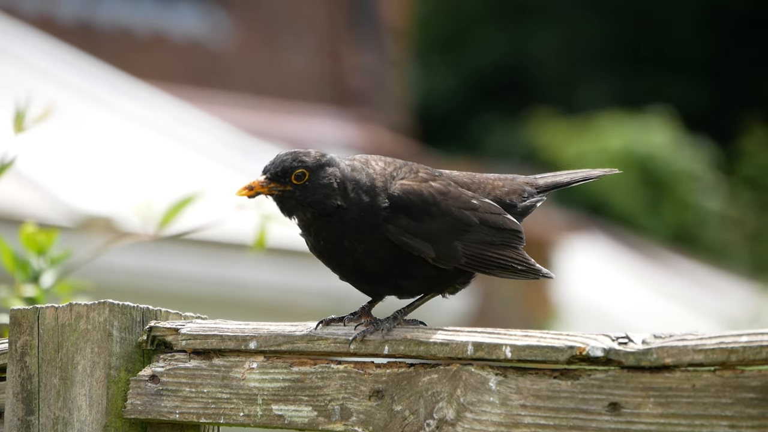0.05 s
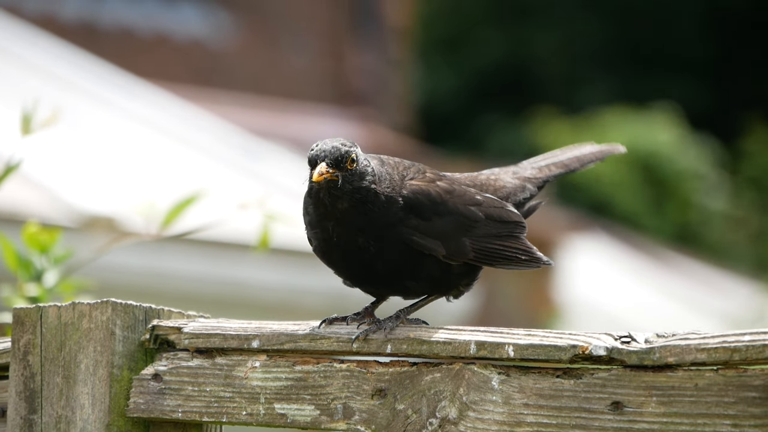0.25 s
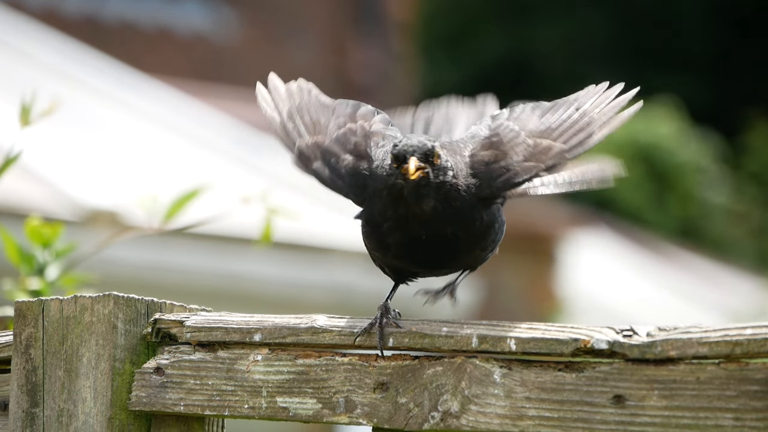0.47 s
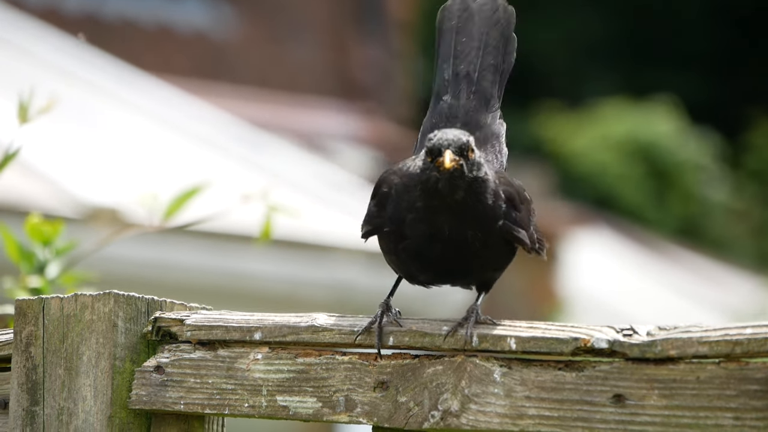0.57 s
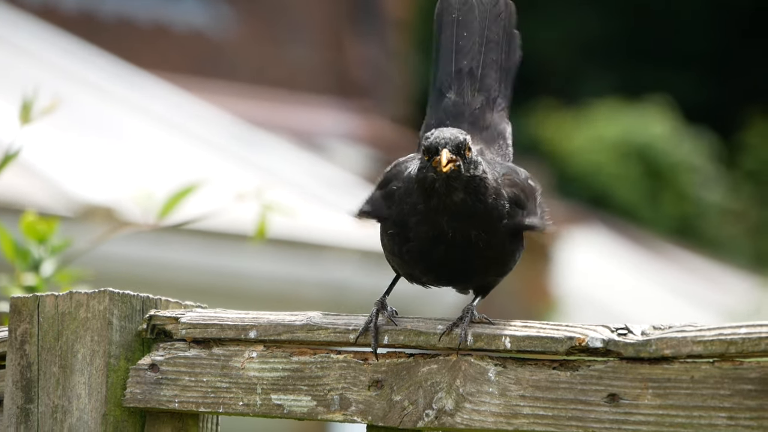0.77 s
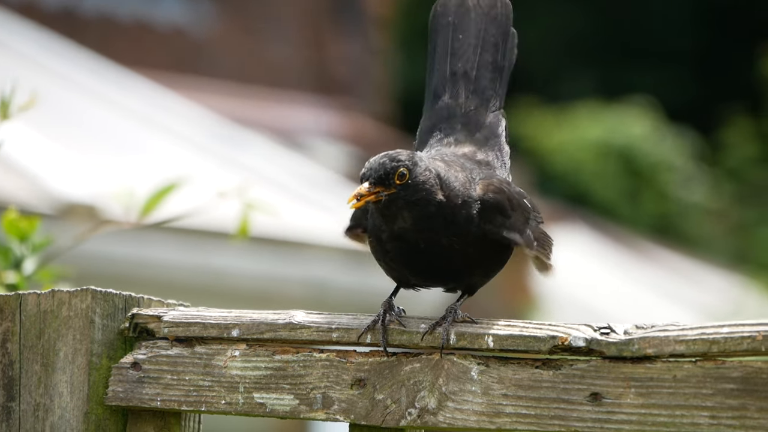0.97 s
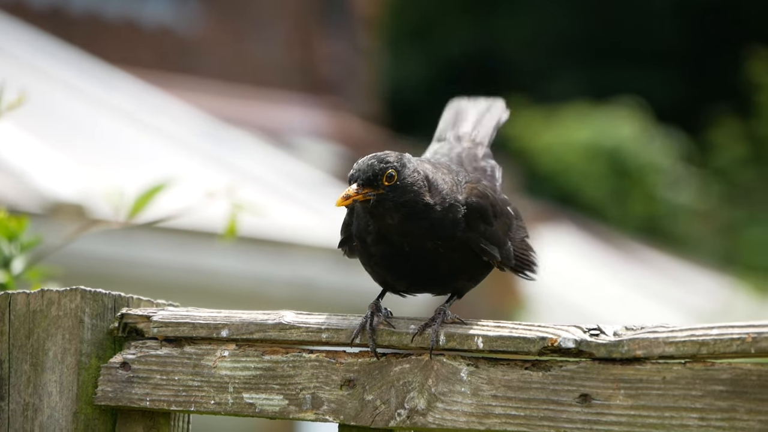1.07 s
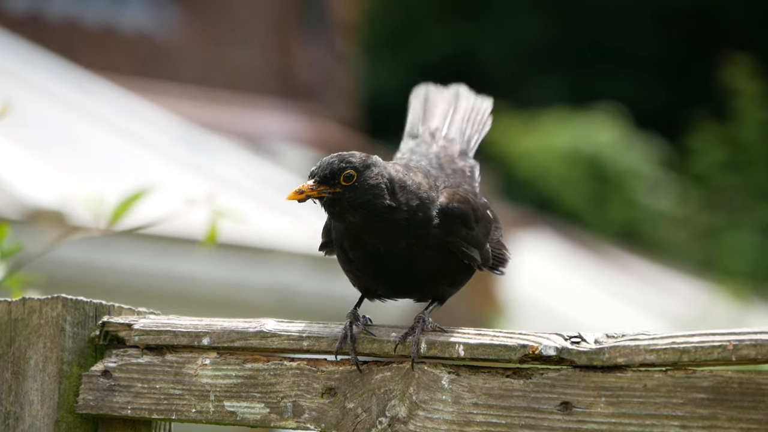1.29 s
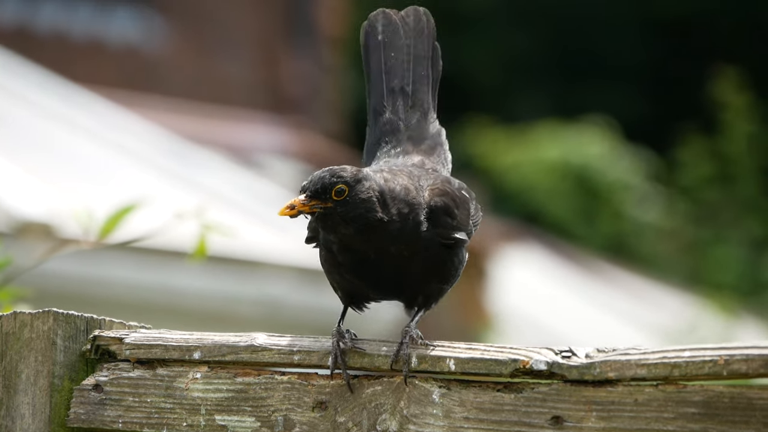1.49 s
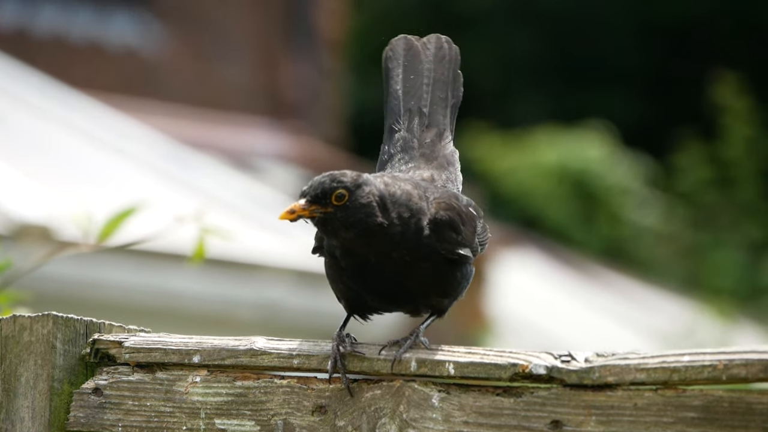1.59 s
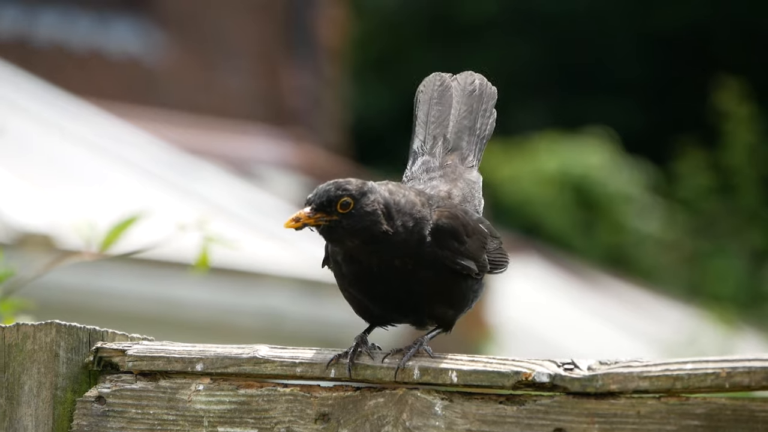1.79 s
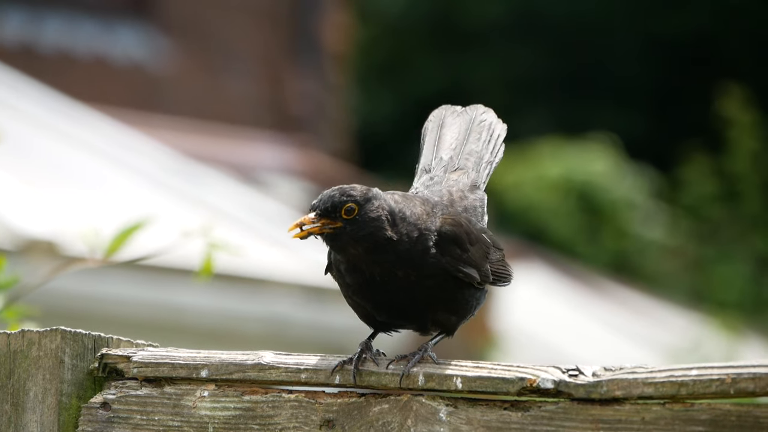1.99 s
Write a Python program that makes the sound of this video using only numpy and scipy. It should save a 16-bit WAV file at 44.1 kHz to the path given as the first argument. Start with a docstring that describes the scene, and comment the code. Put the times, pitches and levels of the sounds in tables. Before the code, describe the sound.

A blackbird gives a quick run of sharp clucks, then two shrill chinks.

```python
"""In a garden, a blackbird on a fence scolds: one soft low note, six clucks of rising pitch, then
two shrill chinks. Both sides of its voice organ (the syrinx) sound at once and mix, making extra
tones at the sum and the difference of their pitches. Its wings flick and its feet land with a thump.
Nearby walls and the garden answer with echoes, and a faint outdoor rumble lies underneath."""
import sys
import numpy as np
from scipy import signal
from scipy.fft import rfft, irfft, next_fast_len
from scipy.io import wavfile
from scipy.ndimage import uniform_filter1d, map_coordinates

SR = 44100
rng = np.random.default_rng(int(sys.argv[2]) if len(sys.argv) > 2 else 0)


def store_wav(level_fs):
    """Save 16-bit WAV to argv[1]."""
    pcm = np.round(np.clip(np.atleast_2d(level_fs), -1, 1) * 32767)
    wavfile.write(sys.argv[1], SR, pcm.T.astype(np.int16))


N = 90404
TIME = np.arange(N) / SR
SPLIT = np.array([[.5], [-.5]])  # shares a difference between left and right


def amp(db):
    """Turn decibels into a number to multiply by."""
    return 10 ** (np.asarray(db) / 20)


def unit(x):
    """Scale a signal to an average strength (rms) of 1."""
    return x / np.sqrt(np.mean(x ** 2) + 1e-20)


def along(points, hz):
    """Read between the rows of a (frequency, value) table, on a musical scale."""
    freqs, values = np.transpose(points)
    return np.interp(np.log(hz + 1), np.log(freqs + 1), values)


def wobble(rate):
    """A smooth curve through `rate` random values a second."""
    return map_coordinates(rng.standard_normal(N // 8), [TIME * rate], mode="wrap")


def swell(peak_s, width_s):
    """A smooth rise and fall, shaped like a bell."""
    return np.exp(-.5 * ((TIME - peak_s) / width_s) ** 2)


def filtered(x, response):
    """Multiply each frequency in x by response(hz)."""
    size = next_fast_len(N + SR // 2)
    return irfft(rfft(x, size) * response(np.fft.rfftfreq(size, 1 / SR)), size)[..., :N]


def noise(spectrum):
    """Noise shaped by a (frequency, level) table."""
    return unit(filtered(rng.standard_normal(N), lambda hz: amp(along(spectrum, hz))))


def puffs(rows, spectrum, width_s):
    """A short swell of noise for each (time, level) row."""
    return noise(spectrum) * sum(amp(db) * swell(time, width_s) for time, db in rows)


def panned(x, db):
    """Make one channel into two, the left louder by db."""
    return x * amp(db * SPLIT)


# tone of the outdoor air (frequency [Hz], relative level [dB])
AIR_TONE = [(15, -60), (25, -33.5), (124, -6), (278, -2), (404, -4.5), (474, -5.5), (653, -8), (1090, -7.5),
            (1210, -12.5), (2010, -20.5), (3720, -28), (4480, -29), (4860, -36), (9480, -48),
            (14900, -60.5)]
# how alike the two ears hear it (frequency [Hz], likeness [0 to 1])
AIR_LIKENESS = [(40, 0.11), (150, .5), (500, 0.56), (1500, .4), (8000, 0.19)]
# which side is louder (frequency [Hz], left minus right [dB])
AIR_BALANCE = [(40, 4.5), (150, -5.5), (350, -2.5), (800, -1), (3000, -0.5)]
# its slow rise and fall (time [s], level [dB])
AIR_LEVEL = [(0, -47), (.3, -45), (.7, -45), (1.05, -43.5), (1.45, -45), (1.8, -47.5), (2.05, -45.5)]


def outdoor_air(patchy_db=1.5, sway_db=.46):
    """Faint wind and far rumble, gently uneven and leaning to the right."""
    spectrum = signal.stft(rng.standard_normal((2, N)), nperseg=1024)[2]
    patches = uniform_filter1d(rng.standard_normal(spectrum.shape[1:]), size=4, axis=0)
    patches = unit(uniform_filter1d(patches, size=10, axis=1))
    pair = signal.istft(spectrum * amp(patchy_db * patches), nperseg=1024)[1][:, :N]
    spread = lambda hz: np.arccos(along(AIR_LIKENESS, hz)) / 2
    shares = lambda hz: [np.cos(spread(hz)), np.sin(spread(hz))]
    mid, side = filtered(pair, lambda hz: amp(along(AIR_TONE, hz)) * shares(hz))
    ears = filtered(np.array([mid + side, mid - side]), lambda hz: amp(along(AIR_BALANCE, hz) * SPLIT))
    level_db = np.interp(TIME, *np.transpose(AIR_LEVEL)) + sway_db * wobble(3)
    return amp(level_db) * unit(ears)


# how long the garden rings (frequency [Hz], time to fade by 60 dB [s])
GARDEN_FADE = [(300, 0.72), (2000, 0.37), (3000, 0.43), (4500, 0.39), (7000, 0.39), (12000, 0.23)]
# tone of its echo (frequency [Hz], boost [dB])
GARDEN_TONE = [(1000, -2), (1700, 4), (2100, 3), (2700, -4), (3400, -2.5), (4400, 3.5), (7000, -0.5),
               (13000, 1.5)]


def garden_echo(sound, gain_db=-16, build_s=.007):
    """A blurred echo, new for each cluck and chink as the bird shifts about."""
    sound = filtered(sound, lambda hz: amp(along(GARDEN_TONE, hz)))
    out = np.zeros((2, N))
    edges = [0] + [int((call[0] - .02) * SR) for call in CLUCKS + CHINKS] + [N]
    for first, last in zip(edges, edges[1:]):
        hz, t, spectrum = signal.stft(rng.standard_normal((3, SR // 2)), SR, nperseg=256)
        fade = amp(-60 * t / along(GARDEN_FADE, hz)[:, None])
        build = 1 - np.exp(-(t / build_s) ** 2)
        tails = signal.istft(spectrum * fade * build, SR, nperseg=256)[1]
        tail = tails[:2] + 1.37 * tails[2]  # one for each ear, plus one they share
        tail /= np.linalg.norm(tail[0])
        echo = signal.fftconvolve(sound[None, first:last], tail, axes=1)[:, :N - first]
        out[:, first:first + echo.shape[1]] += echo
    return amp(gain_db) * out


# bounces off nearby walls (delay [s], left level [dB], right level [dB])
WALL_BOUNCES = [(.00464, -9.5, -11), (.0073, -28, -17), (0.0115, -16, -13), (0.0144, -22.5, -16),
                (.019, -22.5, -23)]


def wall_echoes(sound):
    """Each wall sends back a quieter copy a moment later."""
    return filtered(sound, lambda hz: sum(amp([[left], [right]]) * np.exp(-2j * np.pi * hz * delay)
                                          for delay, left, right in WALL_BOUNCES))


# wing and tail flicks (time [s], level [dB])
FLICKS = [(.765, -55), (.910, -48), (1.52, -64), (1.78, -60)]
# tone of the air they push (frequency [Hz], relative level [dB])
FLICK_TONE = [(20, -25), (50, -15), (85, -3), (130, 3), (300, 18), (2000, -60)]


def wings_and_feet(thump_s=.909, thump_hz=88):
    """Wing flicks push puffs of air; the feet land on the fence with a soft, low thump."""
    flicks = np.array([puffs(FLICKS, FLICK_TONE, width_s=.012) for ear in "LR"])
    thump = amp(-44) * swell(thump_s, width_s=.009) * np.sin(2 * np.pi * thump_hz * (TIME - thump_s))
    return panned(flicks + thump, db=-8.5)


# faint ticks (time [s], level [dB])
TICKS = [(1.457, -55.5), (1.493, -48.5), (1.679, -52)]
# their tone (frequency [Hz], relative level [dB])
TICK_TONE = [(800, -10), (3500, 5), (6000, -8), (11000, -18), (14000, -26.5)]


def ticks():
    """Tiny bursts of bright noise come before the chinks."""
    return puffs(TICKS, TICK_TONE, width_s=.0025)


SWITCH_S = .0025  # time a voice takes to turn on or off


def voice(shape, start=0, stretch=1, pitch=1, end=np.inf, jitter=.014):
    """One side of the syrinx: gives its phase (the angle of its wave) and its loudness."""
    times, pitches, levels = np.transpose(shape)
    times = start + stretch * times
    glide = uniform_filter1d(np.interp(TIME, times, pitches), size=64)
    hz = pitch * glide * (1 + jitter * wobble(1507))  # a fast shake roughens the pitch
    fade_in = np.clip((TIME - times[0]) / SWITCH_S + .5, 0, 1)
    fade_out = np.clip((min(end, times[-1]) - TIME) / SWITCH_S + .5, 0, 1)
    loudness = amp(np.interp(TIME, times, levels)) * np.sin(fade_in * fade_out * np.pi / 2) ** 2
    return 2 * np.pi * np.cumsum(hz) / SR, loudness


def rasp(spectrum, ripple_db=4.5, spacing_hz=344):
    """Air noise under the voice, with narrow peaks at random frequencies."""
    heights = rng.standard_normal(256)
    ripple = lambda hz: np.tanh(map_coordinates(heights, [hz / spacing_hz], mode="wrap"))
    return unit(filtered(noise(spectrum), lambda hz: amp(ripple_db * ripple(hz))))


# path of the faint chirp (time [s], pitch [Hz], level [dB])
CHIRP = [(.322, 4280, -73), (.331, 3830, -53.5), (.340, 3130, -53), (.348, 2800, -72)]


def faint_chirp():
    """One thin voice slides downward."""
    phase, loudness = voice(CHIRP)
    return loudness * np.sin(phase)


# path of the soft first note (time [s], pitch [Hz], level [dB])
SOFT_NOTE = [(.188, 857, -58.5), (.198, 929, -35.5), (.204, 1230, -25.5), (.209, 1570, -33.5),
             (.214, 1721, -22.5), (.226, 1673, -22.5), (.239, 1693, -21), (.244, 1467, -21),
             (.250, 1030, -26.5)]
# its overtones (multiple of the pitch [times], relative level [dB])
SOFT_OVERTONES = [(2, -28), (3, -45), (4, -53), (5, -54.5), (6, -48), (7, -48), (8, -64)]
# tone of the breath, here and in the clucks (frequency [Hz], relative level [dB])
BREATH_TONE = [(1000, -17), (3000, 6.5), (4500, 1), (5800, -8), (7000, -8.5), (8200, -20.5), (9500, -10),
               (10500, -13.5), (11500, -8.5), (13500, -28), (15000, -39.5)]


def soft_note():
    """One voice rises, holds and drops, with weak overtones and a little breath."""
    phase, loudness = voice(SOFT_NOTE)
    overtones = sum(amp(db) * np.sin(round(k) * phase) for k, db in SOFT_OVERTONES)
    breath = amp(-42) * rasp(BREATH_TONE)
    return panned(loudness * (np.sin(phase) + overtones + breath), db=-.5)


# the clucks (start [s], length [s], low voice's top [Hz], high voice's top [Hz], low voice [dB],
# high voice [dB], side tones [dB], ring pitch [Hz], left minus right [dB])
CLUCKS = [(0.4248, .0245, 2032, 2437, -17.5, -24.5, -5, 1900, 2),
          (.586, 0.026, 2229, 2596, -15, -23.5, -6.5, 1950, 0.7),
          (.749, 0.026, 2264, 2702, -17, -18.5, -24.5, 2000, 0.8),
          (0.8992, .025, 2368, 2928, -15, -17, -24.5, 1990, 1),
          (1.0753, .0245, 2410, 2953, -14, -15, -32, 1980, -0.5),
          (1.2567, .025, 2476, 3052, -15.5, -13.5, -30, 2110, -1)]
# paths of the two voices (time [share of length], pitch [share of top], relative level [dB])
CLUCK_LOW = [(0, .68, -25.5), (.13, .82, -8), (.29, .94, -4.5), (.55, 1, -2.5), (.66, 0.943, 3),
             (.77, 0.746, -6.5), (.88, .59, -12), (1, 0.53, -23)]
CLUCK_HIGH = [(0, .7, -21), (.13, 0.86, -5), (.24, 0.97, -1), (.34, 0.96, 0.5), (.45, .9, -6),
              (.58, 0.79, 2), (.7, 0.49, -44)]
# thin hiss that outlasts each cluck (frequency [Hz], relative level [dB])
HISS_TONE = [(5000, -28), (7100, -3.5), (8000, -20), (9100, -6), (10400, -15.5), (11400, -1), (12400, -20),
             (13600, -12), (15000, -29)]


def clucks(flutter=.11, flutter_hz=700, ring_fade_s=.12):
    """Two voices arch upward, beat against each other and plunge, leaving a brief unsteady ring."""
    out = np.zeros((2, N))
    for start, length, low_hz, high_hz, low_db, high_db, side_db, ring_hz, pan_db in CLUCKS:
        low_phase, low = voice(CLUCK_LOW, start, length, low_hz)
        high_phase, high = voice(CLUCK_HIGH, start, length, high_hz)
        low *= 1 + flutter * wobble(flutter_hz)
        high *= amp(high_db - low_db)
        voices = low * np.sin(low_phase) + high * np.sin(high_phase)
        # mixing adds a tone on each side of the pair, and their sum
        sides = low * high * (np.sin(2 * high_phase - low_phase) + np.sin(2 * low_phase - high_phase))
        sum_tone = low * high * np.sin(low_phase + high_phase)
        octave = low * np.sin(2 * low_phase)
        overtones = sum(amp(along(BREATH_TONE, k * low_hz))
                        * (low * np.sin(k * low_phase) + high * np.sin((k - 1) * high_phase))
                        for k in range(3, 7))
        extra_tones = amp(side_db) * sides + amp(-36.5) * (sum_tone + octave) + amp(-40) * overtones
        after = np.maximum(TIME - start - length + SWITCH_S, 0)
        ring_phase = 2 * np.pi * ring_hz * np.cumsum(1 + .0354 * wobble(flutter_hz)) / SR
        ring = amp(-8 - 60 * after / ring_fade_s) * (1 - np.exp(-after / SWITCH_S)) * np.sin(ring_phase)
        breath = amp(-36.5) * np.hypot(low, high) * rasp(BREATH_TONE)
        hiss = amp(-47) * swell(start + .017, width_s=.011) * rasp(HISS_TONE)
        out += panned(amp(low_db) * (voices + extra_tones + ring + breath + hiss), pan_db)
    return out


# the chinks (start [s], length [s], held pitch [Hz], level [dB], fade over the second half [dB],
# left minus right [dB])
CHINKS = [(1.507, 0.053, 4372, -18, 10.5, 1.8), (1.7455, 0.045, 4485, -18, 0.5, 1)]
# paths of the two voices (time after start [s], pitch [times held pitch], relative level [dB])
CHINK_LOW = [(0, 0.5, -31), (.004, .5, -12), (.011, .54, -4.5), (.016, .57, -2.5), (.019, .67, 1.5),
             (.021, 0.98, -2), (.023, 1.01, -2.5), (.029, .995, -2.5), (.04, .98, -3.5), (.054, .975, -4)]
CHINK_HIGH = [(0, .61, -25.5), (.004, .7, -13), (.010, .755, -5), (.016, .79, -11.5), (.019, 1.05, -7),
              (.021, 1.35, -14), (.023, 1.58, -12), (.029, 1.57, -14.5), (.04, 1.55, -15.5),
              (.054, 1.53, -19)]
# tone of the breath (frequency [Hz], relative level [dB])
CHINK_BREATH_TONE = [(1000, -25), (2800, -3), (4500, -12), (5800, 2), (7200, -1.5), (8100, -28), (9000, -2),
                     (11300, -2.5), (12200, -24), (13700, -12), (14800, -43)]
# the breath peaks at the leap (time after start [s], boost [dB])
CHINK_BREATH_SWELL = [(0, 1.5), (.012, -5), (.021, 4), (.027, -2.5), (.054, -3)]


def chinks():
    """Both voices start low, leap about an octave and hold a shrill note."""
    out, air = np.zeros((2, N)), noise(CHINK_BREATH_TONE)
    for start, length, hz, db, fade_db, pan_db in CHINKS:
        low_phase, low = voice(CHINK_LOW, start, pitch=hz, end=start + length, jitter=.0091)
        high_phase, high = voice(CHINK_HIGH, start, pitch=hz, end=start + length, jitter=.0091)
        voices = low * np.sin(low_phase) + high * np.sin(high_phase)
        sum_and_difference = np.sin(low_phase + high_phase) + .42 * np.sin(high_phase - low_phase)
        mixed = amp(-5.5) * low * np.minimum(high, .2) * sum_and_difference
        octave = amp(-23) * low * np.sin(2 * low_phase)
        boost_db = np.interp(TIME - start, *np.transpose(CHINK_BREATH_SWELL))
        breath = amp(-13.5 + boost_db) * np.sqrt(low * high) * air
        fade = np.clip(2 * (TIME - start) / length - 1, 0, 1)
        out += panned(amp(db - fade_db * fade) * (voices + mixed + octave + breath), pan_db)
    return out


# how far the bird's wave is ahead at the left ear (frequency [Hz], lead [radians])
LEFT_LEAD = [(1000, .3), (1700, .36), (2300, .2), (4400, .13), (11000, .1)]


def scene():
    """The bird nearly straight ahead, its echoes and the outdoor air."""
    bird = soft_note() + clucks() + chinks() + faint_chirp() + ticks()
    direct = filtered(bird, lambda hz: np.exp(1j * along(LEFT_LEAD, hz) * SPLIT))
    mono = bird.mean(axis=0)
    return direct + wall_echoes(mono) + garden_echo(mono) + wings_and_feet() + outdoor_air()


def record(dry, top_hz=15000):
    """Cut away the very highest treble."""
    return filtered(dry, lambda hz: hz < top_hz)


dry = scene()
out = record(dry)
store_wav(out)
```